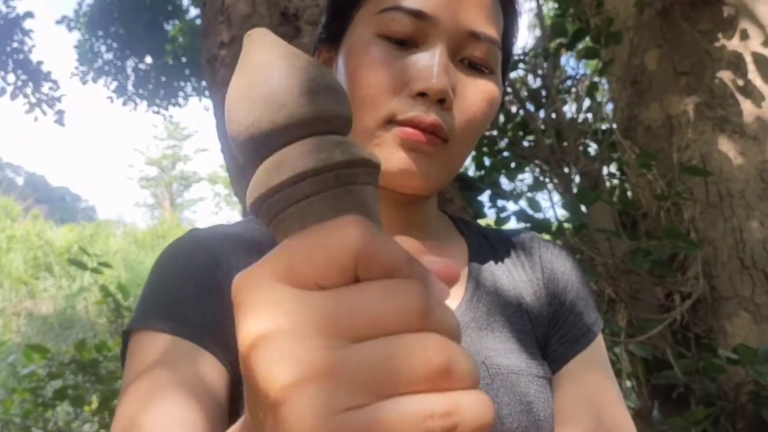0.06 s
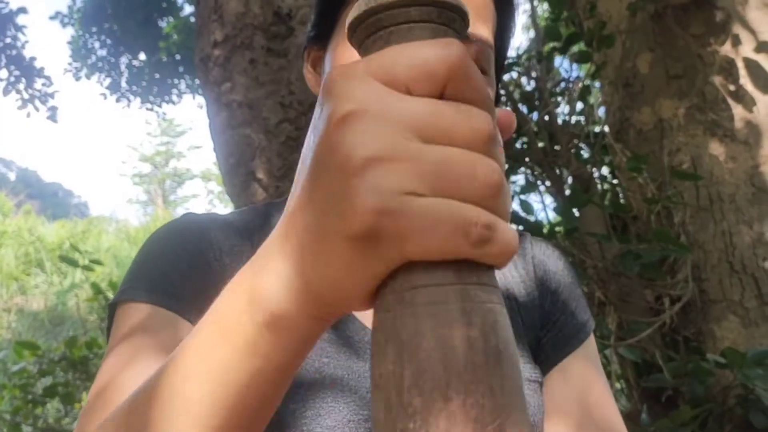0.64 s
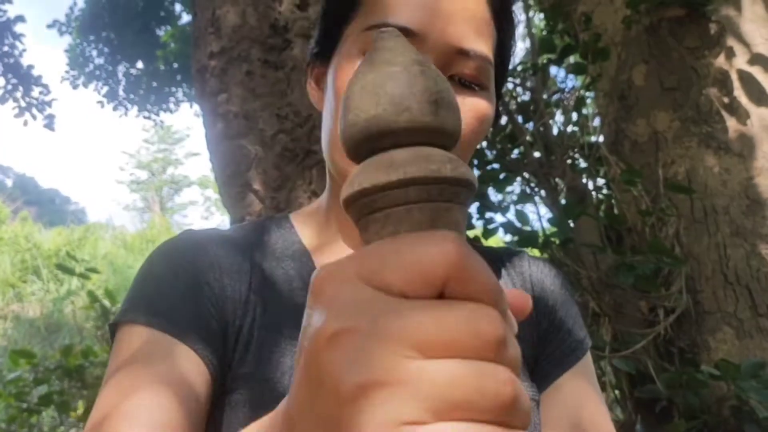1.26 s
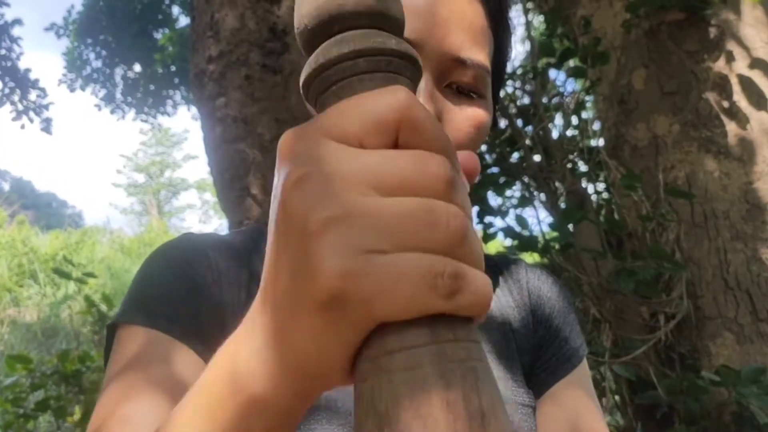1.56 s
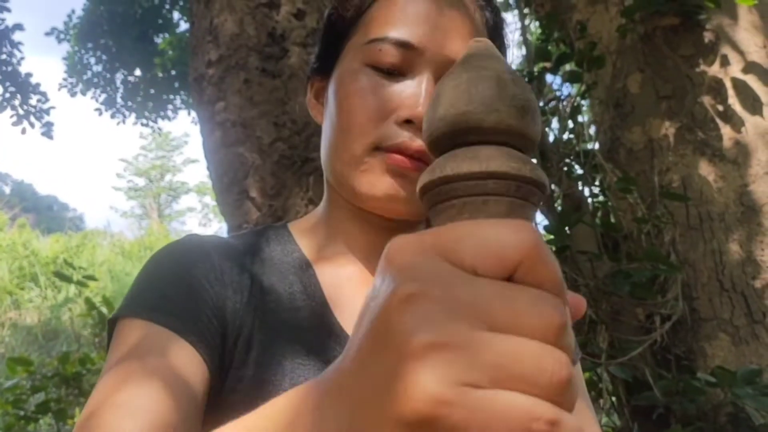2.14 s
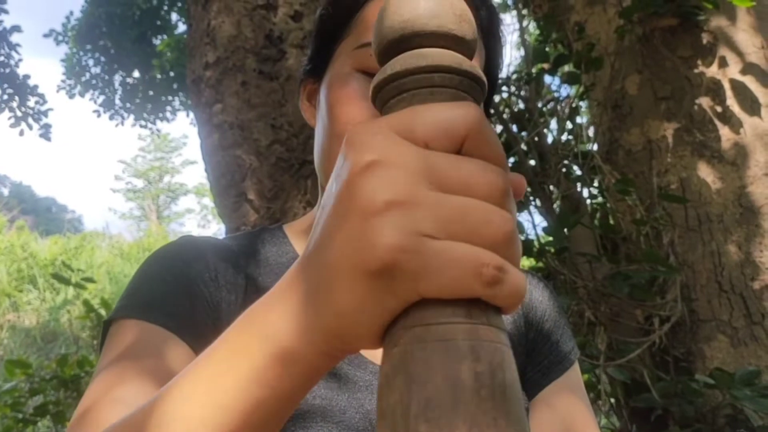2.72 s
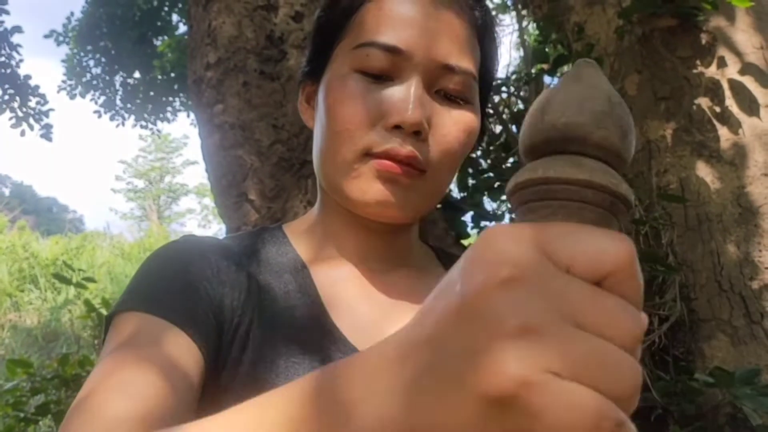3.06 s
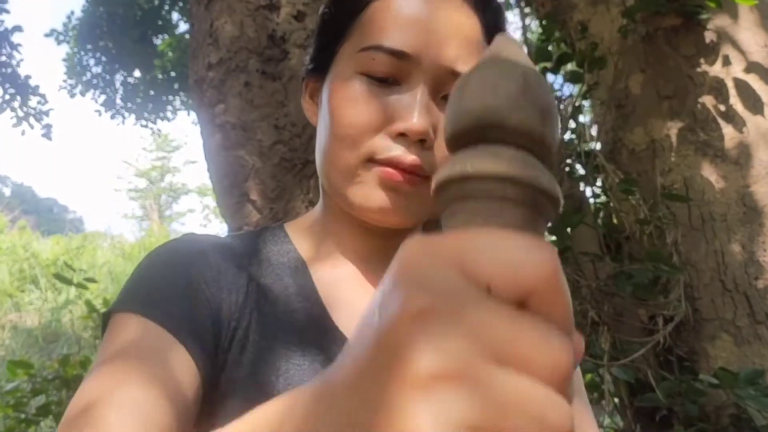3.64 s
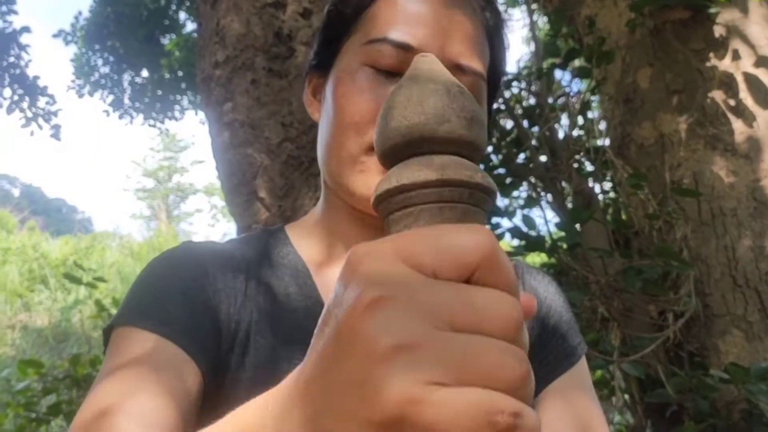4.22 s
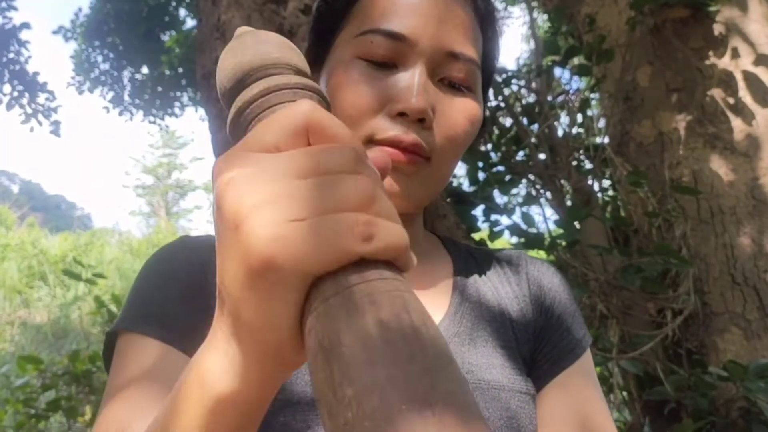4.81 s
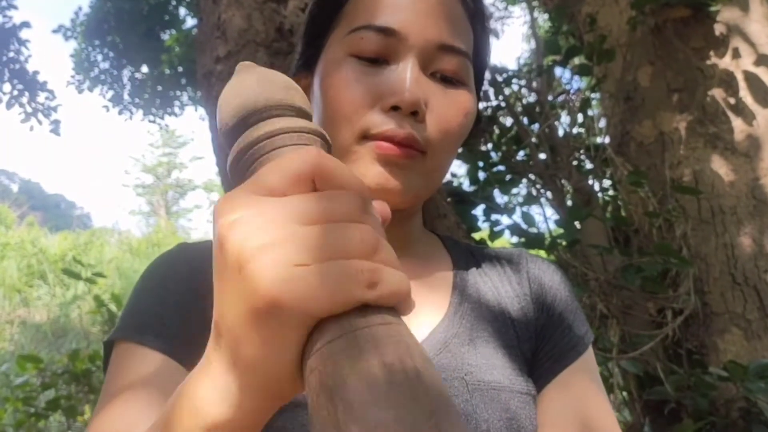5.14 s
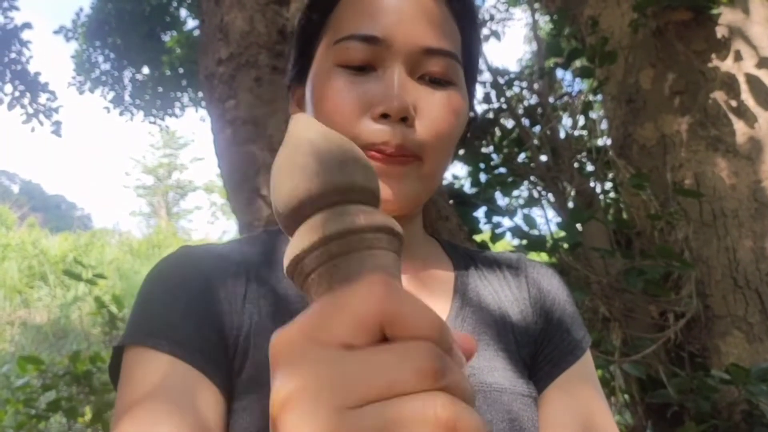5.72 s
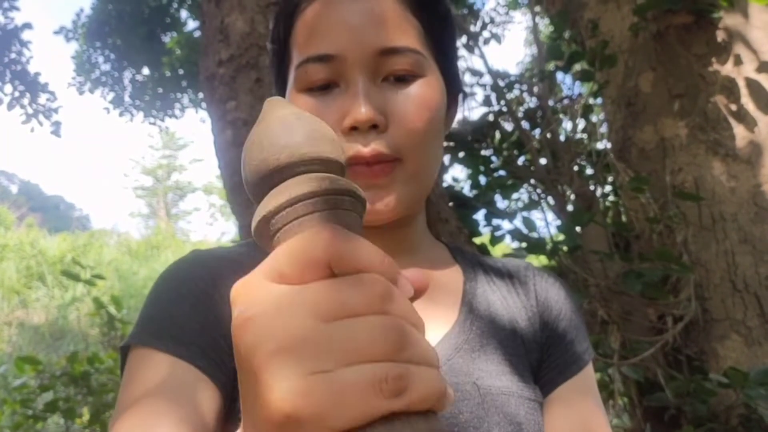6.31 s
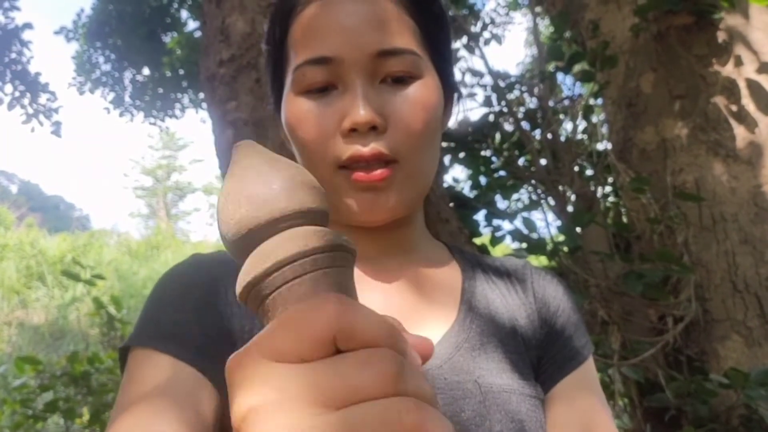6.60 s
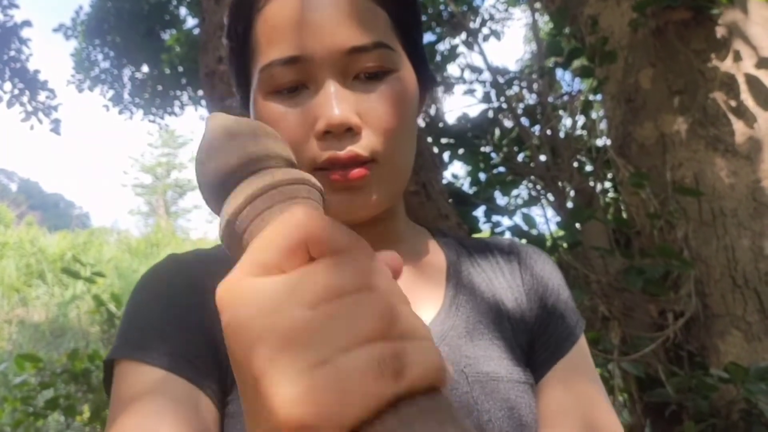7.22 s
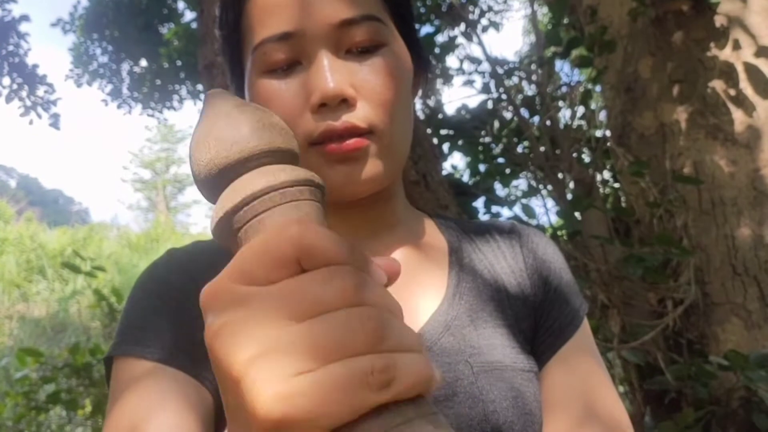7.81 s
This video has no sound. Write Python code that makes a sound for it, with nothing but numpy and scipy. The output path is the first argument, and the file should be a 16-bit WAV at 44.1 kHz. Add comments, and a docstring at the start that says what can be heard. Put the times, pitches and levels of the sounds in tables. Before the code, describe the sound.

A heavy wooden pestle pounds garlic and herbs in a wooden mortar close to the microphone, about two and a half strokes a second for eight seconds. Each stroke squashes wet paste, with a short wooden knock unless the paste cushions it. A moderate knock at 0.2 seconds is followed by two soft strokes, then three knocks from 1.5 to 2.3, the middle one loud. Soft wet thumps follow from 2.8 to 3.6. Knocking returns at 4 and hits hard at 4.4. From 5.2 on, most strokes are sharp, loudest at 5.6 and 6.4, with a softer one at 6.8 and another hard one at 7.2. Tiny wet clicks fall between strokes. Steel ware and other things chatter lightly on the jolted table, and one dish rings a faint clear note after firm blows. Quiet outdoor air and thin, distant insects continue throughout.

```python
"""Wet thumps and sharp knocks, 2.5 a second: a heavy wooden pestle pounds garlic and herbs in a mortar.
Each stroke squashes the paste, then knocks on the wood unless the paste cushions it. Jolted things and
steel ware bounce and chatter on the table; one dish sings after firm strokes. The phone is close, so hard
knocks duck its limiter. Quiet outdoor air and thin insects lie behind."""
import sys
import numpy as np
from scipy import signal
from scipy.fft import rfft, irfft
from scipy.io import wavfile
from scipy.ndimage import uniform_filter1d, minimum_filter1d

SR = 44100
rng = np.random.default_rng(int(sys.argv[2]) if len(sys.argv) > 2 else 0)


def inscribe(sig):
    """Save sig as 16-bit PCM at rate SR to the path in sys.argv[1].

    A 1-D sig is mono; a 2-D sig holds one channel per row.
    Samples are clipped to [-1, 1] before scaling.
    """
    pcm = np.round(np.clip(np.atleast_2d(sig).T, -1, 1) * 32767)
    wavfile.write(sys.argv[1], SR, pcm.astype(np.int16))


N = 355446
TIME_S = np.arange(N) / SR
LEAD = SR // 10  # samples ahead of a contact
LOCAL_S = (np.arange(6 * LEAD) - LEAD) / SR  # time around a contact
SIDES = np.array([[1], [-1]])  # left, right microphone port
SOFT_DB, BARE_DB = -16.0, 4.0  # knock levels: paste takes the whole blow; pestle meets bare wood
SOFT_FLIGHT_S, FIRM_FLIGHT_S = .027, .038  # first hop of things on the table

# pestle strokes: start_s, knock_db, hardness_hz, squelch_db, thud_db, clatter_db, steel_db
STROKES = [ (.2385, -4.5, 638, -27, -32, -33, -48), (.65, -20, 450, -35, -36, -48, -60),
           (1.0588, -54, 1000, -25.5, -50, -50, -68), (1.4943, -3, 514, -23.5, -27, -32, -42),
           (1.9147, 11.5, 800, -20, -30, -35.5, -29), (2.3129, -5.5, 600, -27, -33, -49, -57),
           (2.755, -30, 700, -31, -37, -47, -66), (3.188, -40, 1100, -18.5, -38, -45, -61),
           (3.5834, -36, 900, -21.5, -29, -31, -41), (3.9574, -9, 800, -26, -42, -42, -54),
           (4.3653, 13, 720, -19, -31, -35.5, -41), (4.78, -22, 800, -22.5, -28, -31.5, -50),
           (5.2035, 5.5, 1850, -28, -42, -39, -39), (5.6105, 15.5, 1150, -23, -48, -39, -40),
           (6.022, 3.5, 750, -22.5, -42, -37.5, -40.5), (6.4138, 17.5, 750, -22, -50, -41.5, -44),
           (6.808, -14, 650, -21, -28, -27, -45), (7.1781, 10, 1230, -29.5, -37, -38.5, -39.5),
           (7.5527, -6, 850, -21, -36, -28, -43), (7.9496, 4, 950, -23, -55, -36, -31)]
# mortar and table modes: pitch_hz, level_db, t60_s
WOOD_MODES = [(165, -18.5, 0.02), (244, -18, .04), (316, -15, 0.03), (396, -15.5, 0.028), (478, -15, 0.079),
              (584.6, 4, 0.032), (672, 3, 0.034), (800, -16, 0.11), (980, 7.5, 0.034), (1130, 4, 0.036),
              (1285, -11.5, 0.11), (1728, -14, 0.017), (2800, -13.5, .025), (2000, -3.5, 0.11),
              (2370, -4.5, 0.037), (3100, -17, .035)]
# dry clack spectrum: freq_hz, level_db
CLACK_SPECTRUM = [(60, -6.5), (350, -9.5), (650, -2.5), (1150, 5), (2000, -6.5), (3200, -9.5), (6000, -34),
                  (10000, -43.5), (16000, -53)]


def pestle(squeeze_s=.0024, squeeze_db=-20.0, burst_s=.0014, sway_db=-36.5):
    """Each stroke squeezes the paste just before it reaches the wood; a few also glance off the wall."""
    # glances off the bowl wall: start_s, level_db
    glances = [(.9825, -14), (3.965, -7), (6.4065, -17), (6.8355, -15.5), (7.5755, -6.5)]
    out = np.zeros((2, N))
    for start_s, knock_db, hardness_hz, squelch_db, thud_db, _, _ in STROKES:
        force = np.clip(knock_db / BARE_DB, 0, 1)
        # a faster squeeze is louder; bare wood bursts the juice at once
        rise_s = np.interp(force, [0, 1], [squeeze_s * amp(squeeze_db - squelch_db), burst_s])
        juice = squelch(rise_s, fall_s=.0015 + .29 * rise_s, tail_db=-20, tail_s=.029)
        add(out, start_s - .001, amp(squelch_db) * juice)
        ring_db = np.interp(force, [0, 1], [6.5, -13.5])  # cushioned rings, bare slaps
        thud_hz = np.interp(knock_db, [SOFT_DB, BARE_DB], [130, 160])
        blow = amp(knock_db) * knock(hardness_hz, ring_db, force)
        add(out, start_s, blow + amp(thud_db) * thud(thud_hz) + amp(sway_db) * sway())
    for start_s, level_db in glances:
        add(out, start_s, amp(level_db) * knock(hardness_hz=720, ring_db=3.0, force=0))
    return out


def knock(hardness_hz, ring_db, force, wood_db=-5.0, crunch_db=-19, crunch_s=.007):
    """A brief push radiates a slap; wood rings, fibres crunch. Force: 0 cushioned, 1 bare wood."""
    phase = np.pi * hardness_hz * LOCAL_S
    push = 1 / (1 + phase ** 2)
    sharpness = 1 - .12 * SIDES  # brighter on the right
    # a gentle slap is one crest; a forceful one swings both ways and shoves the air
    slap = np.real(np.exp(-1j * force * np.pi / 2) / (1 - 1j * phase * sharpness) ** 3)
    shove = .11 * force * push
    cushion_hz = min(hardness_hz * (2.3 + 4 * force), SR / 3)  # paste takes the treble
    slap = signal.sosfiltfilt(signal.butter(2, cushion_hz, fs=SR, output="sos"), slap)
    wood = ring(push / push.sum(), WOOD_MODES, detune=.04, apart=.9)
    fibres = rng.standard_normal((2, len(LOCAL_S))) * (LOCAL_S > 0) * np.exp(-np.abs(LOCAL_S) / crunch_s)
    body = amp(wood_db) * wood + amp(crunch_db) * colour(fibres, CLACK_SPECTRUM)
    low_cut = signal.butter(3, 135, "highpass", fs=SR, output="sos")  # little radiates below mode one
    return slap - shove + amp(ring_db) * signal.sosfilt(low_cut, body)


def squelch(rise_s, fall_s, tail_db, tail_s, grain_db=2.5):
    """Juice and air burst out as dense tiny pops, swelling while the gap closes."""
    # wet paste spectrum: freq_hz, level_db
    paste_spectrum = [(100, -2), (600, -1), (1500, -9.5), (3000, -1.5), (5500, -2), (8000, -5), (11000, -9),
                      (16000, -14.5)]
    after_s = np.maximum(LOCAL_S, 0)
    decay = np.exp(-after_s / fall_s) + amp(tail_db) * np.exp(-after_s / tail_s)
    swell = np.exp(np.minimum(LOCAL_S, 0) / rise_s) * decay
    mid, side = rng.standard_normal((2, len(LOCAL_S)))
    grains = amp(grain_db * np.repeat(rng.standard_normal(len(LOCAL_S)), 20)[:len(LOCAL_S)])
    pops = (mid + side * SIDES) * grains * swell
    return with_energy_of(colour(pops, paste_spectrum), swell)


def thud(pitch_hz, peak_s=.004, width_s=.0044):
    """The pestle's weight lands on the table: a short low pulse."""
    return np.sin(2 * np.pi * pitch_hz * LOCAL_S) * np.exp(-((LOCAL_S - peak_s) / width_s) ** 2 / 2)


def sway(pitch_hz=72, rise_s=.024, decay_s=.02):
    """The jolted table wobbles briefly."""
    t = np.maximum(LOCAL_S, 0)
    wobble = np.sin(2 * np.pi * pitch_hz * (1 + .11 * rng.standard_normal()) * t)
    return wobble * (1 - np.exp(-t / rise_s)) * np.exp(-t / decay_s)


def smacks(lift_s=.29, spread_s=.05, lift_db=-56, lift_rise_s=.003):
    """Short wet clicks of paste, just around a stroke or as the pestle lifts."""
    # wet clicks: start_s, level_db, rise_s
    clicks = [(.852, -50, .004), (.998, -44, .003), (1.294, -47, .0036), (2.209, -48, .0016),
              (2.307, -27, .0012), (2.707, -34, .0017), (2.772, -32, .003), (3.648, -40, .0025),
              (4.556, -31, .0008), (7.476, -53, .01)]
    out = np.zeros((2, N))
    lifts = [(start_s + lift_s + spread_s * rng.standard_normal(), lift_db, lift_rise_s)
             for start_s, *_ in STROKES[:-1]]
    for start_s, level_db, rise_s in clicks + lifts:
        add(out, start_s, amp(level_db) * squelch(rise_s, 2.3 * rise_s, tail_db=-23.5, tail_s=.015))
    return out


def chatter(landings_per_s=2200, pair_split=.0033, jingle_db=-13, jingle_t60_s=.09):
    """Jolted things bounce on the table; each small landing clacks and rings wood and steel."""
    # steel ware modes: pitch_hz, level_db, t60_s
    steel_modes = [(1105, -11.5, .14), (2410, -0.5, 0.11), (3170, 4.5, 0.14), (3450, -13, 0.58),
                   (3665, -2, 0.29), (4140, -10.5, .28), (4356, -4.5, .42), (4527, -11, 0.36),
                   (4790, 3.5, .2), (5346, -17, .28), (5900, -2.5, 0.075), (5480, -9.5, .2),
                   (6130, -4, 0.17), (6660, -3, .16), (6820, 0, 0.16), (7800, -13.5, 0.15),
                   (8400, -22.5, .2), (8997, -5.5, 0.061), (10300, -14, .1), (11358, -4.5, .13),
                   (11800, -7.5, .11)]
    # one thing teeters and drops back late: start_s, flight_s, clatter_db, steel_db
    teeter = (5.267, .033, -37.5, -41)
    out = np.zeros((2, N))
    # out-of-round steel rings in close pairs, with short high modes between
    pairs = [(hz * (1 + way * pair_split / 2), db, t60_s)
             for hz, db, t60_s in steel_modes for way in (-1, 1)]
    jingle_hz = np.geomspace(2600, 11500, 24) * rng.uniform(.97, 1.03, 24)
    jingle = [(hz, jingle_db, jingle_t60_s) for hz in jingle_hz]
    jolts = [(start_s, flight_s_of(knock_db), clatter_db, steel_db)
             for start_s, knock_db, *_, clatter_db, steel_db in STROKES]
    for start_s, flight_s, clatter_db, steel_db in jolts + [teeter]:
        dull, bright = bounces(flight_s, loss_db=8.5), bounces(flight_s, loss_db=6.5)
        landed = rng.random(len(LOCAL_S)) < landings_per_s / SR
        landings = landed * rng.standard_normal(len(LOCAL_S))
        clack = with_energy_of(colour((dull * landings)[None], CLACK_SPECTRUM), dull)
        wood = with_energy_of(ring(dull * landings, WOOD_MODES, detune=.05, apart=.9), dull)
        steel = with_energy_of(ring(bright * landings, pairs + jingle, detune=.0004, apart=.8), bright)
        clatter = amp(.5) * clack + amp(-5) * wood
        add(out, start_s, amp(clatter_db) * clatter + amp(steel_db + .3) * steel)
    return out


def bounces(flight_s, loss_db, rebound=.82, spread=.26, buzz_db=-11.0):
    """Rms envelope: a buzz, then four landings, each sooner and softer; low hops die out sooner."""
    hop = np.arange(4)[:, None]
    lands_s = np.cumsum(flight_s * rebound ** hop, axis=0)
    sizes = amp(-loss_db * hop * FIRM_FLIGHT_S / flight_s)
    bouts = sizes * np.exp(-((LOCAL_S - lands_s) / (spread * flight_s)) ** 2 / 2)
    buzz = amp(buzz_db) * (LOCAL_S > 0) * (LOCAL_S < flight_s)
    return np.sqrt(buzz ** 2 + np.sum(bouts ** 2, axis=0))


def flight_s_of(knock_db):
    """Firmer strokes toss things for longer."""
    return np.interp(knock_db, [SOFT_DB, BARE_DB], [SOFT_FLIGHT_S, FIRM_FLIGHT_S])


def dish(pitch_hz=1773, t60_s=.33, rise_s=.012, lag_s=.018, threshold_db=-3.2, settling_db_per_s=-1.8):
    """A dish lands, rocks and rings one clear note after firm strokes, less as it settles."""
    out = np.zeros((2, N))
    t = np.maximum(LOCAL_S + rise_s, 0)
    note = np.sin(2 * np.pi * pitch_hz * t) * (1 - np.exp(-t / rise_s)) * np.exp(-np.log(1000) * t / t60_s)
    for start_s, knock_db, *_ in STROKES:
        if knock_db > threshold_db:
            level_db = -40.5 + settling_db_per_s * start_s
            add(out, start_s + flight_s_of(knock_db) + lag_s, amp(level_db) * note / note.max())
    return out


def air(level_db=-63, shared_below_hz=800):
    """Soft open air, alike at both ports in the bass."""
    # outdoor air spectrum: freq_hz, level_db
    air_spectrum = [(20, 12), (60, 17.5), (110, 10), (180, 6.5), (290, 8), (400, 0.5), (560, 5),
                    (750, -3.5), (1600, -8.5), (3500, 1.5), (6000, -21.5), (15500, -30.5)]
    noise = rng.standard_normal((3, N))
    separate, shared = noise[:2], noise[2]
    blend = separate + signal.lfilter(*signal.butter(1, shared_below_hz, fs=SR), shared - separate)
    return amp(level_db) * unit(colour(blend, air_spectrum))


def insects(shrill_db=-75, shrill_hz=8230, flutter_db=5, chorus_db=-76, chorus_hz=7450):
    """Far insects: one narrow band shrills unevenly over a steady chorus."""
    flutter = amp(flutter_db * np.interp(TIME_S, np.linspace(0, TIME_S[-1], 90), rng.standard_normal(90)))
    shrill = rng.standard_normal((2, N))
    for _ in range(2):
        shrill = resonate(shrill, shrill_hz, width_hz=280)
    chorus = resonate(rng.standard_normal((2, N)), chorus_hz, width_hz=330)
    return amp(shrill_db) * flutter * unit(shrill) + amp(chorus_db) * unit(chorus)


def ring(drive, modes, detune, apart, scatter_db=2):
    """Damped modes, weighted anew per contact; each reaches the two ports a little differently."""
    hz, db, t60_s = np.transpose(modes)
    t = np.arange(len(LOCAL_S) - LEAD) / SR
    size, shift, lean, turn = rng.standard_normal((4, len(hz)))
    side = SIDES * apart * np.minimum(hz / 1200, 1) * (lean / 4 + 1j * turn)
    poles = 2j * np.pi * hz * (1 + detune * shift) - np.log(1000) / t60_s
    waves = np.exp(np.outer(poles, t).astype(np.complex64))
    response = ((amp(db + scatter_db * size) * np.exp(side)) @ waves).real
    return signal.fftconvolve(drive[None], response, axes=1)[:, :len(LOCAL_S)]


def resonate(x, centre_hz, width_hz):
    """One resonance, unity gain at its centre."""
    return signal.lfilter(*signal.iirpeak(centre_hz, centre_hz / width_hz, fs=SR), x)


def colour(x, spectrum):
    """Filter by (freq_hz, level_db) points."""
    hz, db = np.transpose(spectrum)
    bins_hz = np.fft.rfftfreq(x.shape[-1], 1 / SR)
    return irfft(rfft(x) * amp(np.interp(np.log(bins_hz + 1), np.log(hz), db)), x.shape[-1])


def with_energy_of(x, envelope):
    """Scale to the energy of an rms envelope."""
    return x * np.sqrt(np.sum(envelope ** 2) / np.sum(x ** 2) * len(x))


def amp(db):
    """Decibels to gain."""
    return 10 ** (np.asarray(db) / 20)


def unit(x):
    """Scale to unit rms."""
    return x / np.sqrt(np.mean(x ** 2))


def add(out, contact_s, sound):
    """Mix in with the contact at contact_s."""
    start = int(contact_s * SR) - LEAD
    a, b = max(start, 0), min(start + sound.shape[-1], N)
    out[:, a:b] += sound[..., a - start:b - start]


def at_ports(x):
    """Long waves reach both ports alike; short ones differ."""
    # left-right difference: freq_hz, gain_db
    side_spectrum = [(150, -9), (450, -3), (1100, 3.0), (3000, .5)]
    return x.mean(axis=0) + SIDES * colour((x[0] - x[1]) / 2, side_spectrum)


def scene():
    """Mortar and table over air and insects."""
    return at_ports(pestle() + smacks() + chatter()) + dish() + air() + insects()


def limiter(x, ceiling=.95, release_s=.011, window_samples=28):
    """Duck just ahead of each peak; recover at a steady dB rate."""
    over = np.log(np.maximum(np.abs(x).max(axis=0) / ceiling, 1))
    held = np.maximum.accumulate(over + TIME_S / release_s) - TIME_S / release_s
    return x * np.exp(uniform_filter1d(minimum_filter1d(-held, window_samples), window_samples))


def record(dry, dc_offset=.0026, hiss_db=-56.0, clip_level=.55, top_hz=15700):
    """Phone: a treble resonance per port, hiss and offset, limiter, clipped tips, top cut."""
    # port resonances, left then right: centre_hz, width_hz, lift_db
    ports = [(8860, 2100, 7.5), (5700, 470, 9.5)]
    # microphone self-noise: freq_hz, level_db
    hiss_spectrum = [(100, -0.5), (1500, -3), (3500, -3), (7000, 1.5), (11000, -2), (14000, -1),
                     (15500, 2.5)]
    ported = np.array([x + (amp(lift_db) - 1) * resonate(x, centre_hz, width_hz)
                       for x, (centre_hz, width_hz, lift_db) in zip(dry, ports)])
    hiss = amp(hiss_db) * unit(colour(rng.standard_normal((2, N)), hiss_spectrum))
    clipped = np.clip(limiter(ported + hiss + dc_offset), -clip_level, clip_level)
    return signal.sosfilt(signal.ellip(8, .2, 70, top_hz, fs=SR, output="sos"), clipped)


dry = scene()
out = record(dry)
inscribe(out)
```